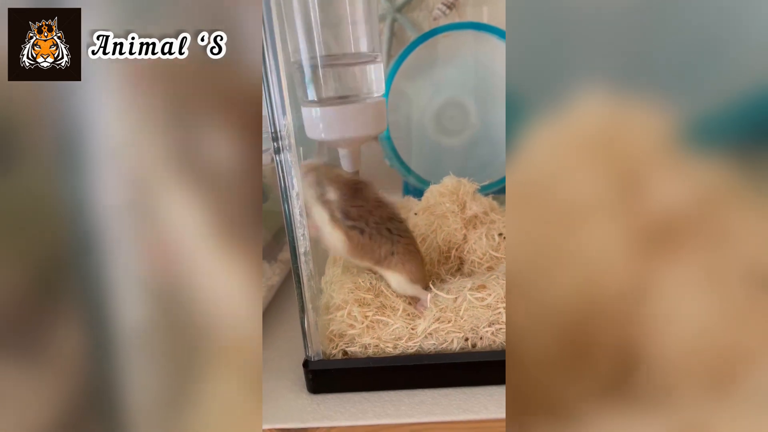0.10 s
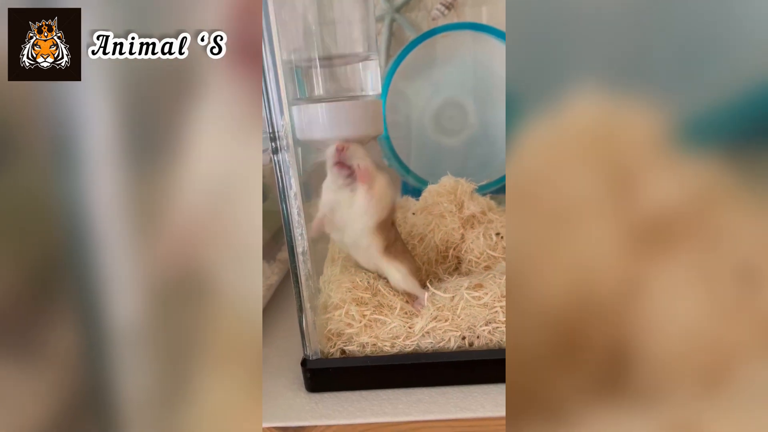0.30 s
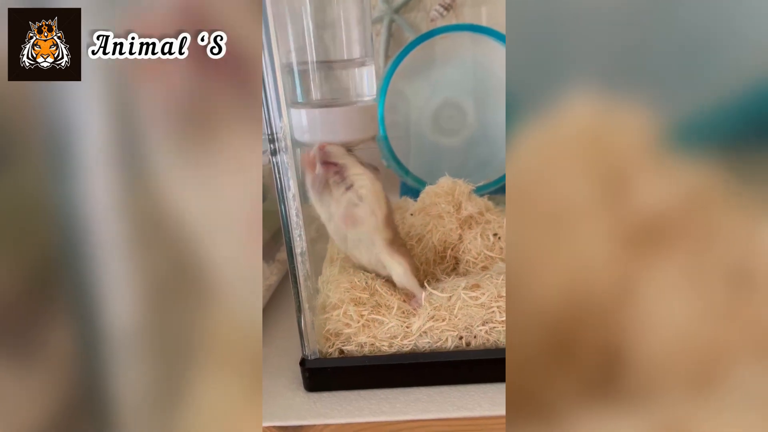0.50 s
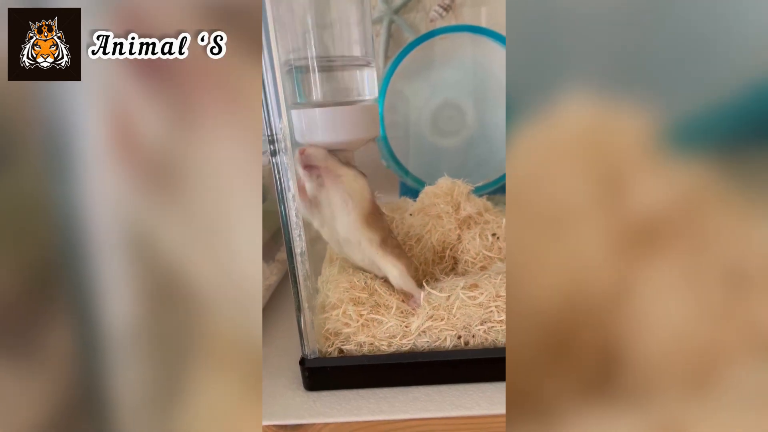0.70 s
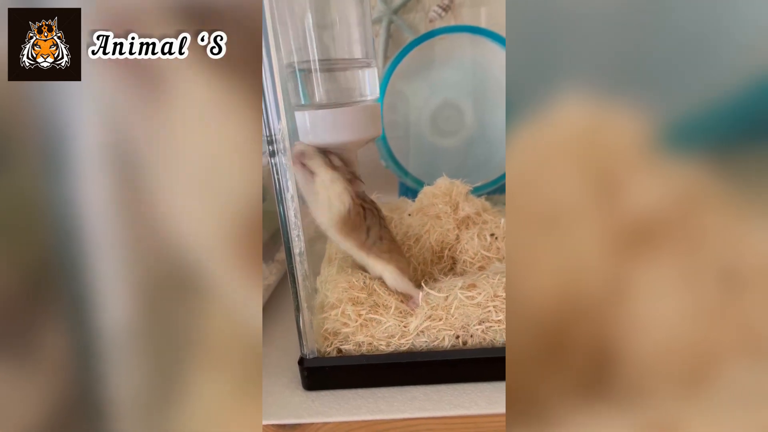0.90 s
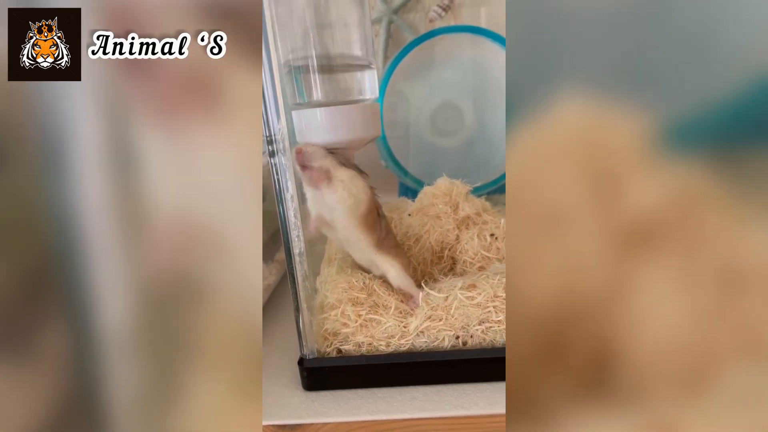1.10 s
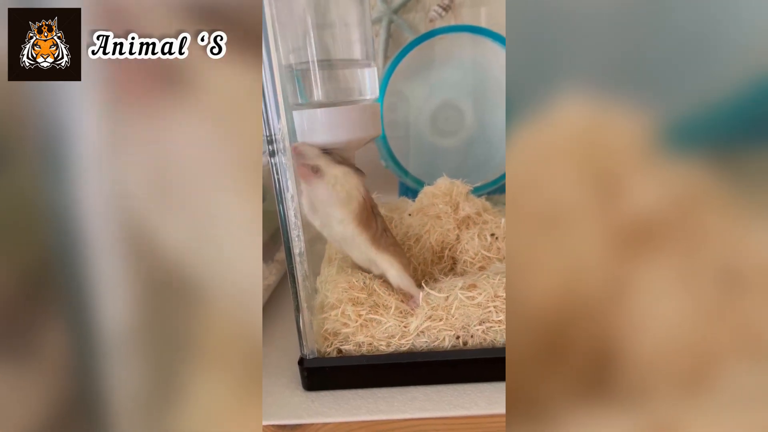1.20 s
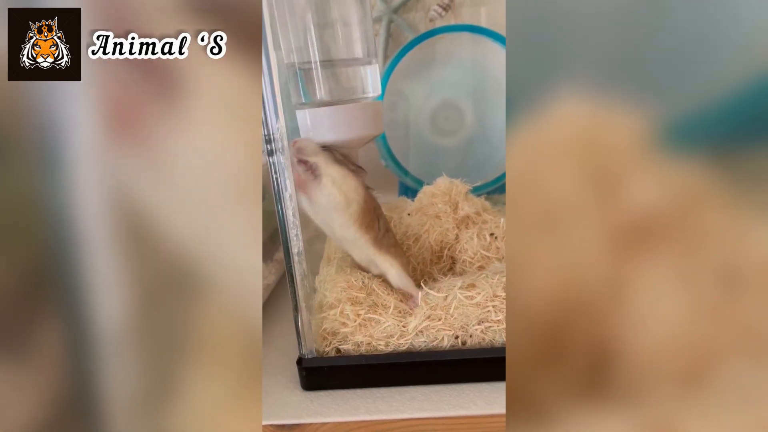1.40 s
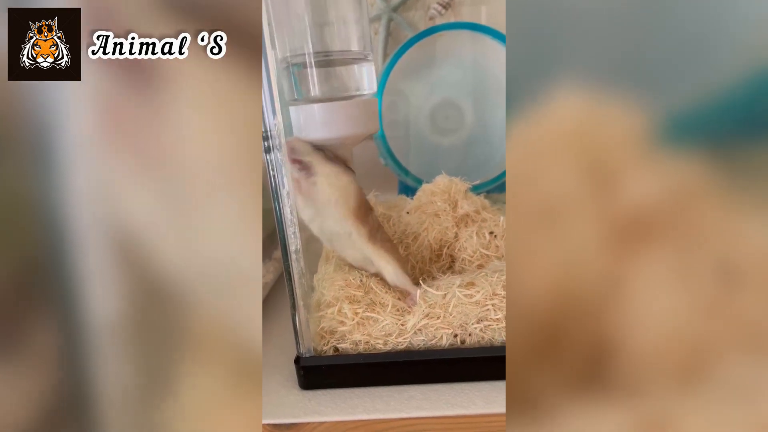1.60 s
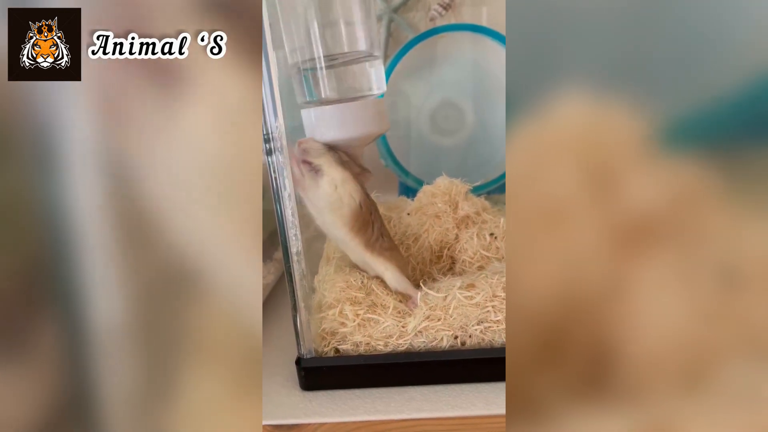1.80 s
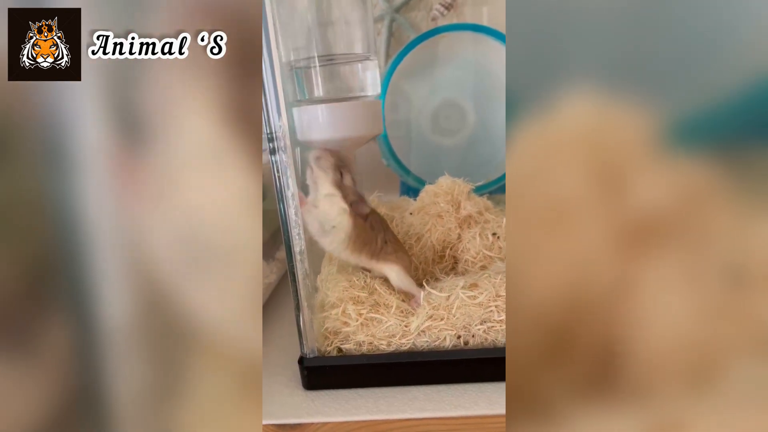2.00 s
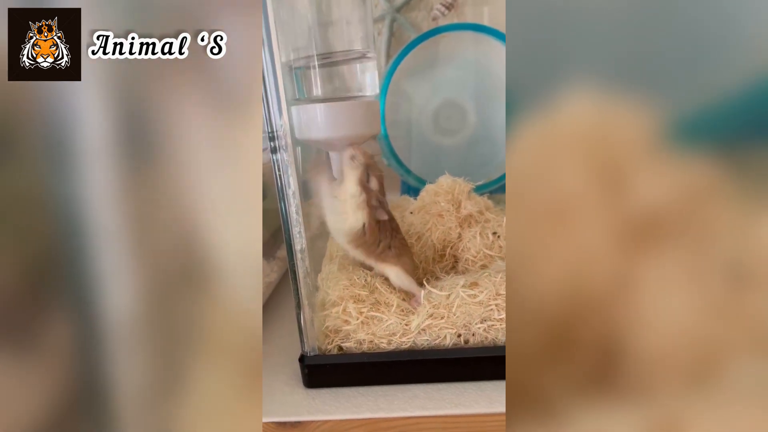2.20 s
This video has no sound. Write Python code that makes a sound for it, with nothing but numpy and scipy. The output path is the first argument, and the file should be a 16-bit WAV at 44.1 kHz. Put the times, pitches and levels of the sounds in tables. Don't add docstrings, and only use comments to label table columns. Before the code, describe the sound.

A water bottle knocks hard against a glass tank as a small rodent works the spout, then soft rustles, taps and tiny ball rattles, with weaker knocks later; close microphone, quiet rumbling room.

```python
import sys
import numpy as np
from scipy import signal
from scipy.fft import rfft, irfft
from scipy.io import wavfile
from scipy.ndimage import uniform_filter1d

SR = 44100
rng = np.random.default_rng(int(sys.argv[2]) if len(sys.argv) > 2 else 0)


def to_wav(sig):
    pcm = np.clip(np.atleast_2d(sig), -1, 1) * 32767
    pcm = np.round(pcm).astype(np.int16)
    wavfile.write(sys.argv[1], SR, pcm.T)


def voltage_ratio(decibels):
    exponent = np.asarray(decibels, float) / 20
    return 10 ** exponent


N = 97020

# start_s, peak_db, bass_db, hardness_db
KNOCK_EVENTS = [(0.203, -6, -8, 9.5), (0.252, -26.5, -12, 16.5), (0.259, -21.5, -13, 3.5),
                (0.296, -27.5, -9.5, 1), (0.448, -36, -1.5, 2.5), (0.668, -38.5, -6, 7), (0.996, -41, 2, 6),
                (1.005, -39, -1, 8), (1.027, -18.5, -5.5, 6), (1.065, -36, -1, -5), (1.537, -22, -8, 4.5),
                (1.631, -42.5, -11.5, 5), (1.836, -38, -4, 9), (1.845, -36.5, -11, -12),
                (1.86, -38.5, -9, 2), (1.905, -22, -6.5, 6), (1.978, -34.5, -4.5, -3.5),
                (2.182, -47, 3.5, -3.5)]
# start_s, peak_db, centre_hz, contact_s
TAP_EVENTS = [(.9175, -38.5, 1085, 0.0043), (1.395, -47.5, 790, 0.0036), (1.784, -47.5, 820, .002),
              (1.999, -38, 1120, 0.0028), (2.002, -38, 690, 0.0034), (2.2, -39, 1146, 0.0038),
              (2.025, -35, 710, 0.0033), (.465, -35, 126.3, 0.0091), (.452, -38, 433, .008),
              (.49, -43, 247, .01), (1.24, -50, 337, 0.026), (1.105, -47.5, 900, 0.019),
              (1.785, -55, 3000, 0.0036), (1.85, -42.5, 1253, 0.012), (1.839, -43, 1620, 0.0075),
              (.672, -51, 1650, 0.0089), (1.52, -43, 592, .012), (.69, -47, 630, 0.013),
              (.93, -52, 420, 0.039), (0.19, -25.5, 1190, .006), (.198, -30, 370, 0.0025),
              (.216, -23.5, 900, .01), (.251, -25, 1430, 0.011), (.676, -39.5, 1030, 0.012),
              (0.826, -53.5, 1460, 0.013), (.935, -47, 990, 0.021), (1, -42, 1110, 0.017),
              (1.038, -34.5, 850, 0.016), (1.234, -48.5, 1230, 0.049), (1.505, -48, 840, 0.03),
              (1.633, -40, 1030, 0.012), (1.643, -40, 770, 0.015), (1.837, -38.5, 1000, 0.042),
              (1.918, -41, 900, 0.012), (2.044, -38, 595, 0.0025)]
# pitch_hz, level_db, t60_s
PANE_MODES = [(126, -14.5, 0.61), (174, 2, 0.38), (187.7, 4, 0.25), (228.8, -3.5, 0.32)]
# pitch_hz, level_db, t60_s
BOTTLE_MODES = [(318.7, -5, 0.25), (379, -14.5, 0.25), (435.5, 2, 0.077), (488, -24.5, 0.42),
                (570, -29, 0.33), (649.4, -12.5, 0.17), (788, -18.5, 0.26), (838.6, -11, 0.19),
                (873, -27, 0.081), (944, -19.5, 0.15), (699.6, 13, 0.019), (860, 5, 0.014),
                (1940, -12.5, 0.015), (362.3, 9.5, 0.053)]
# pitch_hz, level_db, t60_s
SPOUT_MODES = [(1054, -19, 0.091), (1146, -23.5, 0.12), (1280, -18.5, .08), (1451, -19.5, 0.026),
               (1652, -19.5, 0.06), (2038, -29, 0.072), (2276, -10.5, 0.013), (2990, -35.5, 0.08)]
SIDE_DB = -9


def knocks():
    side_db, port_lag_s = -24, .004
    ringing = bend(blows())[:N] + taps()[:N]
    lagged = np.roll(ringing, int(port_lag_s * SR))
    apart = colour(lagged, [(150, -85), (350, -31.5), (700, 9.5), (3000, -1)])
    tail_mid, tail_side = knock_tail()
    return ringing + tail_mid, tail_side + voltage_ratio(side_db) * apart


def blows():
    knock_db, scatter_db, detune, delay_s = -4.5, 1.2, .008, .0005
    out = np.zeros(N + SR)
    hz, db, t60 = columns(PANE_MODES + BOTTLE_MODES + SPOUT_MODES)
    index = np.arange(len(hz))[:, None]
    is_pane = index < len(PANE_MODES)
    is_spout = index >= len(PANE_MODES + BOTTLE_MODES)
    for start_s, peak_db, bass_db, hardness_db in KNOCK_EVENTS:
        level_chance, pitch_chance = rng.standard_normal((2, len(hz), 1))
        tilt_db = bass_db * is_pane + hardness_db * is_spout
        gain_db = db + scatter_db * level_chance + tilt_db + peak_db + knock_db
        struck = ring(hz * (1 + detune * pitch_chance), gain_db, t60)
        i = int((start_s + delay_s) * SR)
        out[i:i + len(struck)] += struck
    return out


def bend(x):
    bend_s_root_hz, fastest_hz, low_cut_hz = .045, 2600, 110
    f = np.arange(len(x) // 2 + 1) * SR / len(x)
    phase_turns = bend_s_root_hz * (2 * np.sqrt(f) - f / np.sqrt(fastest_hz))
    low_cut = 1 / (1 + (low_cut_hz / (f + 1)) ** 6)
    return irfft(rfft(x) * np.exp(-2j * np.pi * phase_turns) * low_cut, len(x))


def taps():
    octaves_wide, rise_cycles, damping, lag_samples = .4, .9, .45, 40
    tap_db, contacts_per_s, rebound = -.1, 500, .6
    pock_db, pock_cycles = 17, 26
    size, contact_size = 9000, 2000
    t = np.arange(contact_size) / SR
    out = np.zeros(N + SR)
    hz, _, t60 = columns(PANE_MODES + BOTTLE_MODES + SPOUT_MODES)
    damped_s = damping * np.clip(t60, .06, .5)
    for start_s, peak_db, centre_hz, contact_s in TAP_EVENTS:
        chance, strength = rng.random((2, contact_size))
        hits = (chance < contacts_per_s / SR) * (2 * strength - 1)
        hits = hits * rebound * np.exp(-t / max(contact_s, .001))
        hits[0] = 1
        near_db = -6 * (np.log2(hz / centre_hz) / octaves_wide) ** 2
        pock = ring(np.array([[centre_hz]]), pock_db, pock_cycles / centre_hz, rise_cycles, size=size)
        modes = ring(hz, near_db, damped_s, rise_cycles, size=size)
        tap = signal.fftconvolve(pock + modes, hits)
        i = int(start_s * SR) + lag_samples
        out[i:i + len(tap)] += voltage_ratio(peak_db + tap_db) * tap / np.abs(tap).max()
    return out


def knock_tail():
    tail_db, t60_s, rise_s, side_db = -15, 0.21, 0.0017, -10.5
    knock_delay_s, tap_db = .0005, -4
    t = np.arange(14000) / SR
    wash = fade(t, t60_s) * np.minimum(t / rise_s, 1)
    starts = [(s + knock_delay_s, peak_db) for s, peak_db, _, _ in KNOCK_EVENTS]
    starts += [(s, peak_db + tap_db) for s, peak_db, _, _ in TAP_EVENTS]
    shape = np.zeros(N + SR)
    for start_s, peak_db in starts:
        i = int(start_s * SR)
        shape[i:i + len(t)] += voltage_ratio(peak_db) * wash
    dull = [(120, -20), (400, -2), (895, -3), (2500, -17), (6000, -40)]
    return [voltage_ratio(tail_db + db) * colour(shape[:N] * rng.standard_normal(N), dull) for db in (0, side_db)]


def cracks():
    crack_db, t60_s = -35.5, 0.028
    t, shape = np.arange(N) / SR, np.zeros(N)
    for start_s, peak_db, _, hardness_db in KNOCK_EVENTS:
        strength = voltage_ratio(peak_db + hardness_db + crack_db)
        shape += strength * (t > start_s) * fade(np.abs(t - start_s), t60_s)
    bright = [(1200, -24.0), (2400, -1.0), (5500, 5.5), (12000, -11.5)]
    return [voltage_ratio(db) * colour(shape * rng.standard_normal(N), bright) for db in (0, SIDE_DB)]


def rustles():
    # start_s, peak_db, hold_s, t60_s
    scuffs = [(0.119, -65.5, 0.026, 0.44), (0.192, -41, 0.0057, .05), (0.203, -23, 0.0043, 0.076),
              (0.233, -35, 0.0055, .1), (0.251, -33, 0.0022, 0.042), (0.263, -28.5, 0.013, 0.051),
              (0.294, -48, 0.012, 0.29), (0.448, -61, 0.013, 0.093), (.61, -73, 0.016, 0.11),
              (0.642, -55.5, 0.0051, 0.056), (0.675, -56, 0.0099, 0.2), (0.716, -54.5, 0.02, 0.14),
              (0.801, -49.5, 0.01, 0.17), (0.815, -46.5, 0.006, 0.13), (0.877, -58, 0.00795, 0.11),
              (0.971, -57.5, .008, 0.1), (1.001, -50.5, 0.012, 0.14), (1.023, -43.5, 0.0084, 0.33),
              (1.068, -44.5, 0.02, 0.15), (1.188, -58, .01, 0.28), (1.23, -41.5, 0.014, 0.21),
              (1.331, -51, 0.024, 0.13), (1.384, -49.5, 0.0084, 0.059), (1.49, -58, 0.011, 0.2),
              (1.532, -51, 0.022, 0.1224), (1.559, -45, 0.017, 0.17), (1.626, -55, 0.015, 0.15),
              (1.702, -50, .003, 0.038), (1.721, -55, 0.024, 0.58), (1.776, -60, 0.0073, 0.055),
              (1.834, -45.5, 0.017, 0.18), (1.908, -45, 0.01, 0.12), (1.93, -43.5, 0.0079, 0.14),
              (1.984, -56.5, .004, 0.063), (2.004, -53, .004, .06), (2.029, -60.5, 0.007, 0.083)]
    # pitch_hz, level_db
    scuff_colour = [(700, 7.5), (2500, -3), (3800, -3.5), (5100, -1.5), (6300, -6), (7700, -6),
                    (13000, -11.5), (15500, -15.5)]
    rustle_db, rise_s, patchy_db, patches_per_s = -11.5, 0.0035, 3.5, 32
    grains_per_s, grain_db, grain_s = 2800, 3, 0.0037
    shape, out = swells(scuffs, rise_s), []
    for db in (rustle_db, rustle_db + SIDE_DB):
        ticks = (rng.random(N) < grains_per_s / SR) * voltage_ratio(grain_db * rng.exponential(size=N))
        grain_shape = signal.lfilter([1], [1, -np.exp(-1 / (grain_s * SR))], ticks)
        grains = grain_shape * rng.standard_normal(N)
        scale = voltage_ratio(db) / np.std(colour(grains, scuff_colour))
        out.append(scale * colour(octaves(grains * shape, patchy_db, patches_per_s), scuff_colour))
    return out


def chatter():
    # start_s, level_db, length_s
    bursts = [
        (0.263, -53.5, 0.072),
        (0.663, -66, 0.054),
        (1.032, -65, 0.072),
        (1.234, -59, 0.016),
        (1.556, -65.5, 0.061),
        (1.719, -67, 0.037),
        (1.847, -60.5, 0.0226),
        (1.925, -60, 0.037),
        (1.976, -72, 0.071),
    ]
    # pitch_hz, level_db, t60_s
    ball_modes = [(3200, -17.5, 0.015), (4330, -9.5, 0.027), (4540, -14.5, 0.079), (4940, -22, 0.067),
                  (5393, -1, 0.022), (5604, -7.5, 0.029), (7370, -5.5, 0.02), (7840, -3.5, 0.015),
                  (8540, -11.5, 0.019)]
    hits_per_s, scatter_db, rise_s = 610, 6, 0.001
    t, effort, out = np.arange(N) / SR, np.zeros(N), []
    for start_s, db, length_s in bursts:
        late = t - start_s
        effort += voltage_ratio(db) * np.clip(np.minimum(late / rise_s, 1.2 - late / length_s), 0, 1)
    tube = ring(*columns(ball_modes))
    for db in (0, SIDE_DB):
        hits = (rng.random(N) < hits_per_s / SR) * voltage_ratio(scatter_db * rng.standard_normal(N) + db)
        out.append(signal.fftconvolve(hits * effort, tube)[:N])
    return out


def fizz():
    # start_s, level_db, hold_s, t60_s
    brushes = [(.06, -89, 0.092, .2), (.201, -56.5, .004, .07), (.265, -62.5, .03, 0.19),
               (.5, -88, .07, .3), (.6, -82.5, 0.047, 0.13), (.672, -72.5, .02, 0.071),
               (.715, -76.5, .02, .1), (.77, -90, 0.035, 0.17), (1.0, -72.5, 0.0088, 0.069),
               (1.04, -72, .05, 0.22), (1.14, -86, .015, .1), (1.235, -78, 0.013, .15),
               (1.335, -78, .025, .1), (1.44, -86.5, .02, .15), (1.54, -73.5, 0.034, 0.12),
               (1.67, -85.5, .02, .1), (1.72, -87, 0.022, .15), (1.84, -71, 0.02, 0.092),
               (1.925, -68, 0.028, 0.11)]
    rise_s, flicker_db, flickers_per_s = .008, 2.3, 90
    shape = swells(brushes, rise_s) * voltage_ratio(flicker_db * walk(flickers_per_s))
    thin = [(8000, -31.5), (11000, -0.5), (13200, 1), (15600, -11.5)]
    return [voltage_ratio(db) * shape * level(colour(rng.standard_normal(N), thin), 0) for db in (0, SIDE_DB)]


def room():
    # pitch_hz, level_db
    rumble_colour = [(20, -66.5), (55, 9), (100, 1), (160, -5), (500, -8), (1000, -21), (3000, -34),
                     (5000, -56)]
    # pitch_hz, level_db
    side_colour = [(20, -45.5), (150, -0.5), (300, -2), (570, 1.5), (2000, -21.5), (3000, -18.5),
                   (15000, -50.5)]
    rumble_db, side_db, flicker_db, flickers_per_s = -57.5, -70, 2.5, 2.9
    hum_hz, hum_width_hz, hum_db, hiss_db = 88.2, 9.8, -61.5, -90
    noise = rng.standard_normal((4, N))
    hum = signal.lfilter(*signal.iirpeak(hum_hz, hum_hz / hum_width_hz, SR), noise[0])
    rumble = colour(octaves(noise[1], flicker_db, flickers_per_s), rumble_colour)
    hiss = voltage_ratio(hiss_db) * colour(noise[2], [(8800, -3), (10000, -7), (11200, -1)])
    mid = level(rumble, rumble_db) + level(hum, hum_db) + hiss
    return mid, level(colour(noise[3], side_colour), side_db)


def columns(modes):
    return np.array(modes, float).T[:, :, None]


def fade(t, t60):
    return np.exp(-np.log(1000) * t / t60)


def ring(hz, db, t60, rise_cycles=.3, size=14000):
    t = np.arange(size) / SR
    shape = (1 - np.exp(-t * hz / rise_cycles)) ** 2 * fade(t, t60)
    taper = 0.97 ** np.arange(len(hz))[:, None]
    return (voltage_ratio(db) * taper * shape * np.sin(2 * np.pi * hz * t)).sum(axis=0)


def swells(table, rise_s):
    t, power = np.arange(N) / SR, np.zeros(N)
    for start_s, peak_db, hold_s, t60 in table:
        late = np.maximum(t - start_s - hold_s, 0)
        rise = np.clip((t - start_s) / rise_s, 0, 1)
        power += (voltage_ratio(peak_db) * rise * fade(late, t60)) ** 2
    return np.sqrt(power)


def octaves(x, flicker_db, rate):
    spacing, out = .7, np.zeros(N)
    spectrum, pitch = rfft(x), np.log2(np.arange(N // 2 + 1) * SR / N + 1)
    for centre in np.arange(4, 15, spacing):
        share = np.cos(np.pi / 2 * np.clip((pitch - centre) / spacing, -1, 1)) ** 2
        out += voltage_ratio(flicker_db * walk(rate)) * irfft(spectrum * share, N)
    return out


def colour(x, points):
    hz = np.arange(N // 2 + 1) * SR / N + 1
    point_hz, point_db = np.array(points, float).T
    return irfft(rfft(x) * voltage_ratio(np.interp(np.log(hz), np.log(point_hz), point_db)), N)


def level(x, db):
    return x * voltage_ratio(db) / np.sqrt(np.mean(x ** 2))


def walk(rate):
    k = int(SR / rate)
    return level(uniform_filter1d(uniform_filter1d(rng.standard_normal(N), k), k), 0)


def scene():
    notch_hz, notch_width_hz, notch_db = 10000, 620, -34
    hz = np.arange(N // 2 + 1) * SR / N
    notch = voltage_ratio(notch_db * np.exp(-((hz - notch_hz) / notch_width_hz) ** 4))
    tank = np.sum([knocks(), cracks(), rustles(), chatter(), fizz()], axis=0)
    mid, side = np.array(room()) + irfft(rfft(tank) * notch, N)
    side = colour(side, [(100, -24), (300, 0), (9000, 0)])
    return np.array([mid + side, mid - side])


def low_pass(x):
    return signal.sosfilt(signal.butter(12, 15820, fs=SR, output="sos"), x)


def record(dry):
    top_hz = 15800
    hz = np.arange(N // 2 + 1) * SR / N
    mix = irfft(rfft(dry) * (hz < top_hz), N)
    return low_pass(mix)


dry = scene()
out = record(dry)
to_wav(out)
```